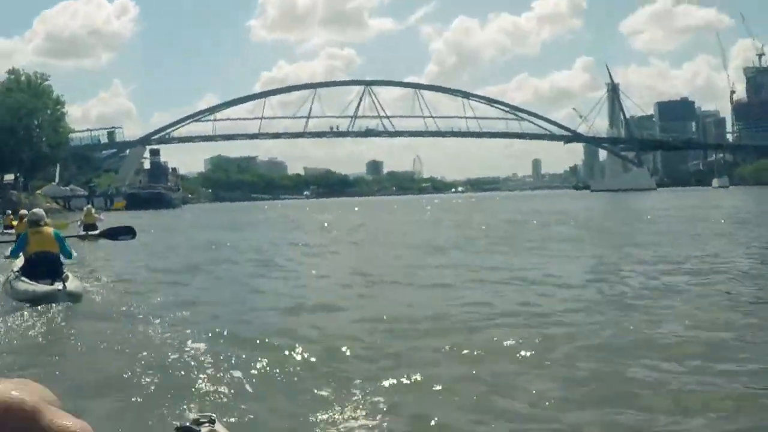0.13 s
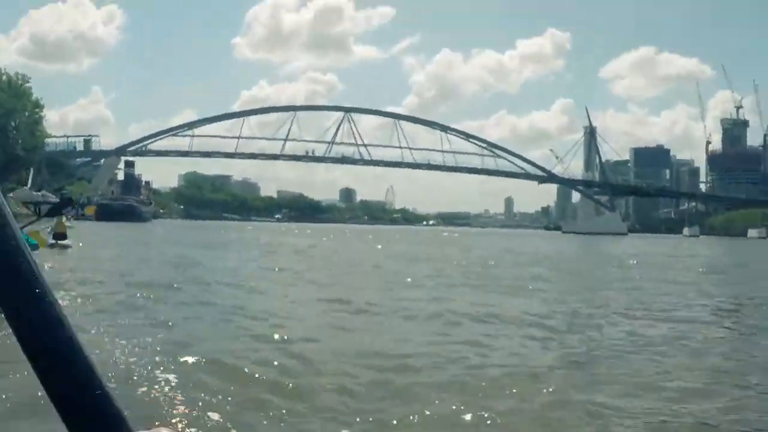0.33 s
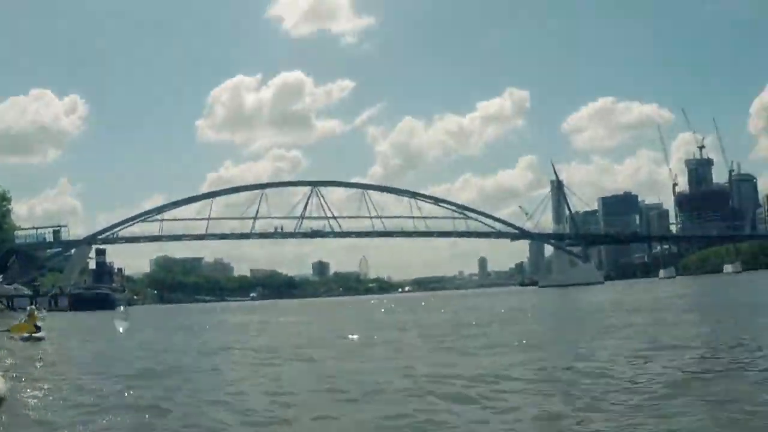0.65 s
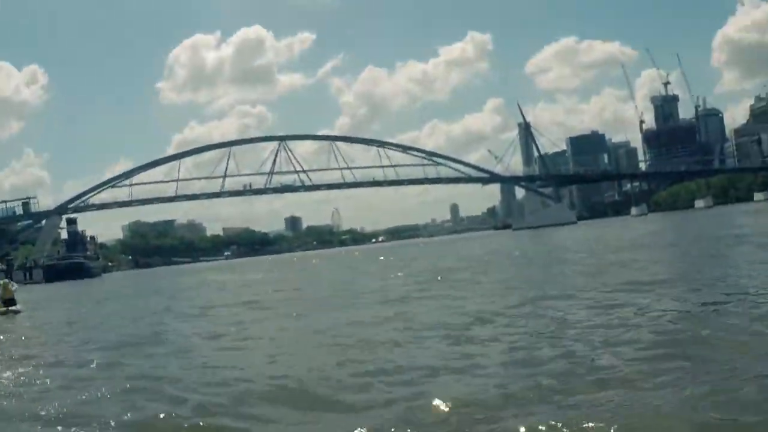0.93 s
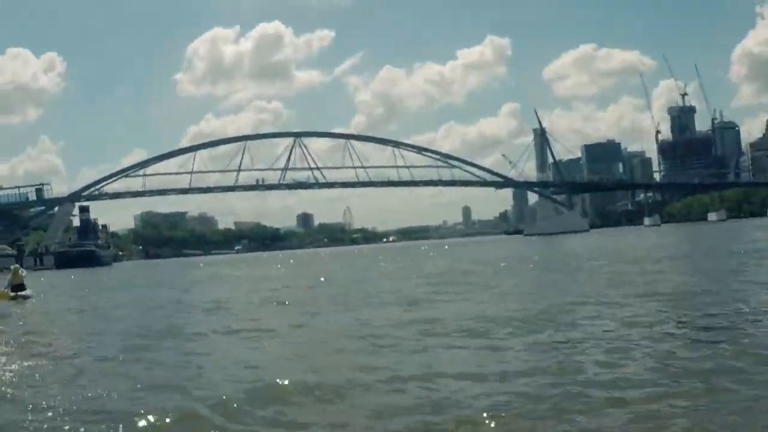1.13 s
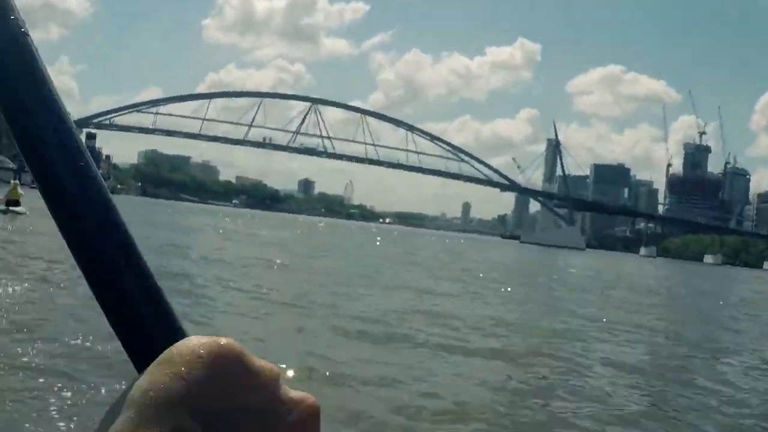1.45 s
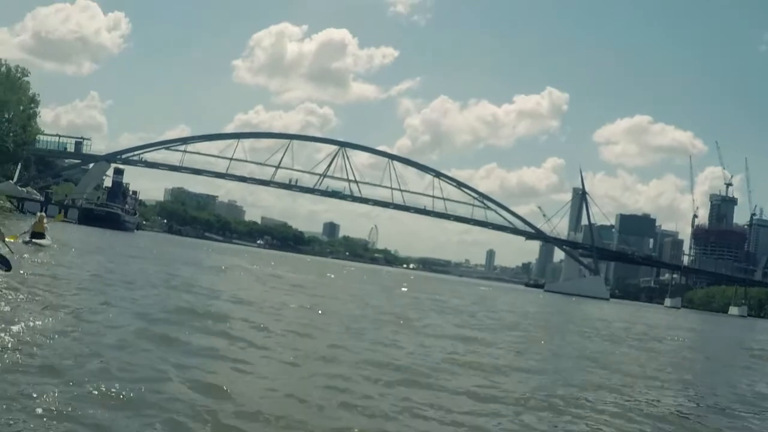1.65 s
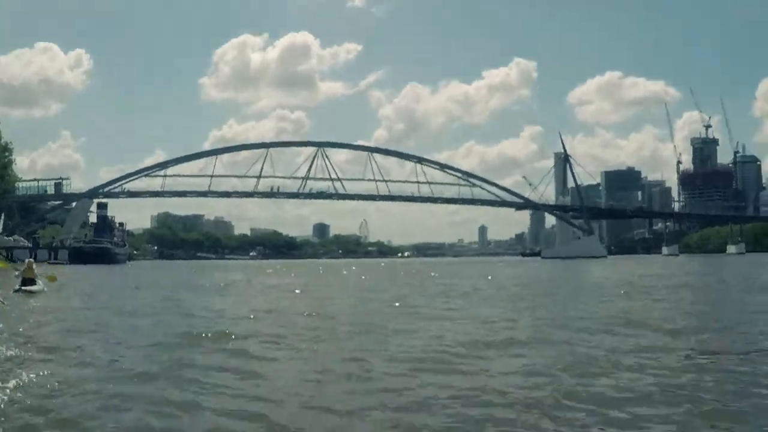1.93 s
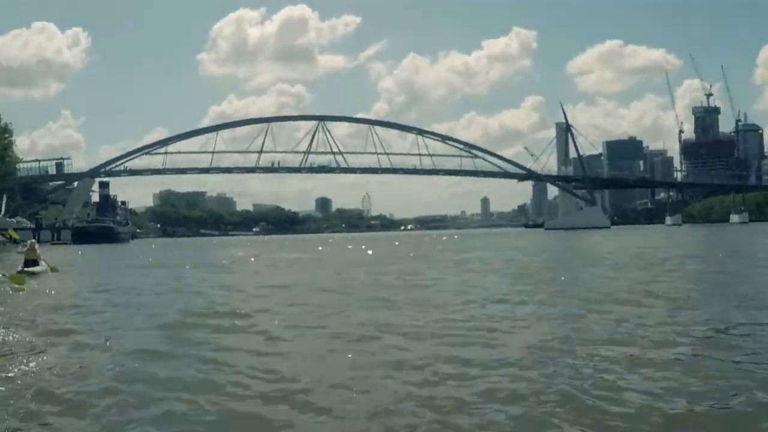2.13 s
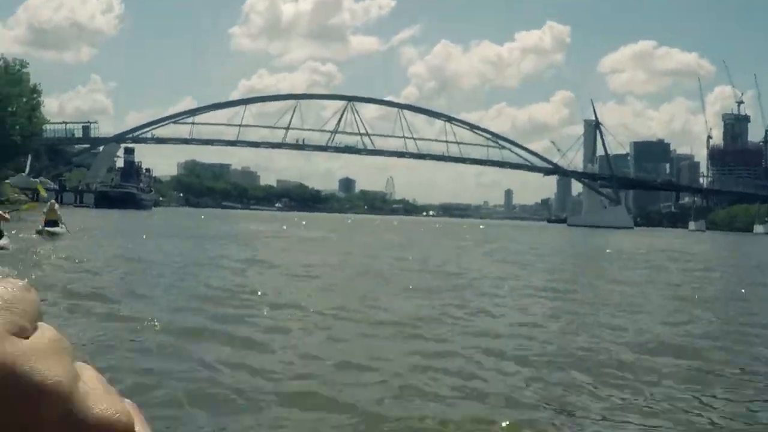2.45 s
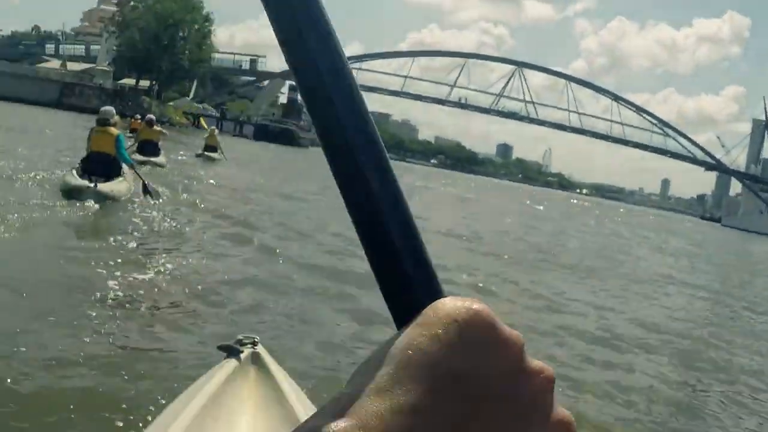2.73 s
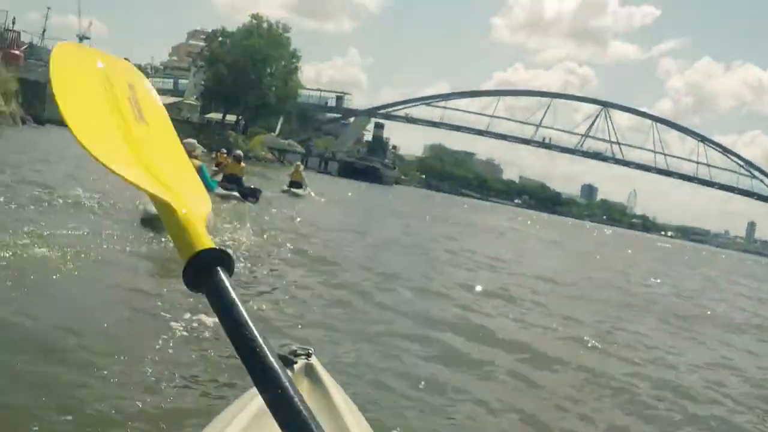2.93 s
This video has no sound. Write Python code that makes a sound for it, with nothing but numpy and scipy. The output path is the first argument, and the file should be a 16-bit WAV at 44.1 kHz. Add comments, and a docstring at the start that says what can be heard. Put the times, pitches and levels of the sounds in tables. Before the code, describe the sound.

A kayak paddle churns river water close to a muffled microphone; wind rumbles low throughout, bubbles plop and drops tick, a heavy splash comes early, and a booming hull slap follows late.

```python
"""A kayak is paddled along a choppy river, heard from a camera in a waterproof case worn by the paddler.
From the start, wind (filtered noise) buffets the case, the river washes (noise and tiny bubbles), and a
faint tone whines once a second. Soon the strokes add spray and gulps (ringing bubbles), then drops tick (short
noise). Heavy water gives a low shudder at 0.67 s; a plop of falling pitch follows at 1.34 s. At 2.48 s
a splash slaps close by (noise bands) and the hull rings and booms. The case colours the water sounds."""
import sys
import numpy as np
from scipy import signal
from scipy.fft import rfft, irfft
from scipy.io import wavfile
from scipy.ndimage import uniform_filter1d

SR = 44100
rng = np.random.default_rng(int(sys.argv[2]) if len(sys.argv) > 2 else 0)


def dump(signal):
    """Clip the signal to [-1, 1] and save it as 16-bit WAV at the path in sys.argv[1]."""
    limited = np.clip(np.atleast_2d(signal).T, -1, 1)
    pcm = np.round(limited * 32767).astype(np.int16)
    wavfile.write(sys.argv[1], SR, pcm)


N = 136710
TIME = np.arange(N) / SR  # seconds
FREQS = np.fft.rfftfreq(N, 1 / SR)  # Hz


def amp(db):
    """Turns decibels into a gain."""
    return 10 ** (np.asarray(db) / 20)


def unit(x):
    """Scales a sound to an average (rms) strength of 1."""
    return x / np.sqrt(np.mean(x ** 2) + 1e-20)


def curve(points):
    """Joins a table of (time, value) by straight lines, one value per sample."""
    return np.interp(TIME, *np.transpose(points))


def spectrum(points):
    """Joins a table of (frequency, dB) by straight lines along a logarithmic pitch scale."""
    hz, db = np.transpose(points)
    return np.interp(np.log(FREQS + 1), np.log(hz + 1), db)


def noise(gain):
    """Random noise of rms 1, with each frequency scaled by the given gain."""
    white = rng.standard_normal(N)
    return unit(irfft(rfft(white) * gain, N))


def band(hz, octaves):
    """Noise in a bell-shaped band around one pitch."""
    distance = np.log2((FREQS + 1) / hz) / octaves
    return noise(np.exp(-.5 * distance ** 2))


def drift(rate_hz):
    """A randomly wandering control of rms 1, mostly slower than the given rate."""
    return noise(np.exp(-(FREQS / rate_hz) ** 2))


def steadied(x, seconds):
    """Evens out the swells of a noise that are slower than the given time."""
    power = abs(uniform_filter1d(x ** 2, max(int(seconds * SR), 2)))
    return x / np.sqrt(power + 1e-6)


def burst(start, rise, decay):
    """A loudness shape: straight rise, then exponential decay."""
    t = TIME - start
    return np.clip(t / rise, 0, 1) * np.exp(-np.maximum(t - rise, 0) / decay)


def add(mix, s, sound):
    """Mixes a sound in at a time in seconds."""
    part = mix[max(round(s * SR), 0):][:len(sound)]
    part += sound[:len(part)]


def bubble(hz, t60, rise, glide):
    """A trapped air bubble: a ring that fades by 60 dB in t60 seconds, its pitch creeping up if glide > 0."""
    t = np.arange(0, t60, 1 / SR)
    loudness = (1 - np.exp(-t / rise)) * amp(-60 * t / t60)
    return loudness * np.sin(2 * np.pi * hz * t * (1 + glide * t / t60))


def bubbles(hz, spread, per_s, cycles, spread_db, size=N, count=24):
    """A swarm of bubbles of many sizes around one pitch, each ringing for a set number of cycles, rms 1."""
    out = np.zeros(size)
    for step in np.linspace(-1, 1, count) + rng.uniform(-1.25, 1, count) / count:
        pitch = min(hz * np.exp(2 * spread * step), SR / 3)
        births = (rng.random(size) < per_s / count / SR) * rng.choice([-1, 1], size)
        strength = amp(spread_db * np.minimum(rng.exponential(1, size), 4))
        strength = strength * np.exp(-step ** 2) * np.sqrt(pitch)
        ring = bubble(pitch, cycles / pitch, .4 / pitch, 0.099)
        out += signal.oaconvolve(births * strength, ring)[:size]
    return unit(out)


def swarms(rows, spread, cycles, spread_db):
    """Swarms of bubbles that swell and die away exponentially around their loudest moments."""
    out = np.zeros(N)
    for s, rise, fall, db, hz, per_s in rows:
        # three quarters of a second, from a quarter second before the height
        t = np.arange(SR // 2 + SR // 4) / SR + max(s - 1 / 4, 0)
        swarm = steadied(bubbles(hz, spread, per_s, cycles, spread_db, size=len(t)), 0.017)
        loudness = amp(db) * np.exp(-np.maximum((s - t) / rise, (t - s) / fall))
        add(out, t[0], swarm * loudness)
    return out


def falling_ring(s, db, first_hz, last_hz, glide, rise, decay):
    """A damped ring whose pitch falls quickly at first, then settles."""
    hz = last_hz + (first_hz - last_hz) * np.exp(-np.maximum(TIME - s, 0) / glide)
    phase = 2 * np.pi * np.cumsum(hz * (TIME >= s)) / SR
    return amp(db) * burst(s, rise, decay) * np.sin(phase)


# strength of the wind's slow rumble: (time [s], level [dB])
RUMBLE_LEVEL = [(0, -36.5), (.12, -31.5), (.26, -27), (.37, -23.5), (.48, -28), (.56, -42.5), (.72, -33),
                (.88, -41.5), (1.06, -32), (1.3, -33), (1.55, -34), (1.88, -35.5), (2.0, -39.5), (2.2, -38),
                (2.44, -37.5), (2.66, -30), (2.84, -27.5), (2.96, -36.5), (3.1, -34.5)]
# strength of the quicker buffeting, before its random lumps: (time [s], level [dB])
BUFFET_LEVEL = [(0, -58.5), (.12, -47), (.23, -51), (.42, -46.5), (.58, -45), (.75, -42.5), (.86, -50.5),
                (1.05, -48), (1.3, -53.5), (1.58, -45.5), (1.75, -52.5), (1.88, -46.5), (2.0, -50),
                (2.27, -45.5), (2.42, -48), (2.6, -49.5), (2.82, -46), (3.1, -48.5)]
# tone of the slow rumble: (frequency [Hz], relative level [dB per Hz])
RUMBLE_TONE = [(1, -43), (14, 4), (24, 8.5), (38, -0.5), (52, -7), (72, -13.5), (105, -29), (160, -37.5),
               (300, -42), (800, -79), (4000, -100)]
# tone of the quicker buffeting: (frequency [Hz], relative level [dB per Hz])
BUFFET_TONE = [(25, -40), (45, -4), (70, 3.5), (95, -9.5), (125, -15.5), (200, -18), (400, -28.5),
               (1500, -84)]
BUFFET_LUMPS_DB = 1.3


def wind():
    """Slow pressure swings that follow the gusts, and quicker lumps of buffeting above them."""
    rumble = steadied(noise(amp(spectrum(RUMBLE_TONE))), 0.148)
    buffet = steadied(noise(amp(spectrum(BUFFET_TONE))), 0.13)
    buffet_db = curve(BUFFET_LEVEL) + BUFFET_LUMPS_DB * drift(rate_hz=15)
    return rumble * amp(curve(RUMBLE_LEVEL)) + buffet * amp(buffet_db)


# strength of the river, before the case: (time [s], level [dB])
WASH_LEVEL = [(0, -45.5), (.3, -45.5), (.7, -44.5), (.92, -45.5), (1.3, -46.5), (1.5, -45), (1.8, -44.5),
              (2.1, -44.5), (2.35, -45.5), (2.55, -47.5), (2.75, -43.5), (2.95, -44.5), (3.1, -44.5)]
# tone of the wash: (frequency [Hz], relative level [dB per Hz])
WASH_TONE = [(40, -16), (200, -2.5), (400, -0.5), (650, 0.5), (1000, 2.5), (1600, 3.5), (2400, 0),
             (4000, -3.5), (6500, -6.5), (9000, -3.5), (15000, 3)]
WASH_FLICKER_DB, WASH_FLICKER_HZ = 1.23, 22.2
# fizz: level against the wash, bubbles per second, unevenness of their strengths
FIZZ_DB, FIZZ_PER_S, FIZZ_SPREAD_DB = -10.5, 900, 4


def river():
    """Wash of the chop, flickering octave by octave, with small bubbles bursting nearby."""
    octave = np.log2(FREQS + 1)
    gain = amp(spectrum(WASH_TONE))
    wash = np.zeros(N)
    for k in range(15):
        # neighbouring octaves overlap and cross-fade
        part = gain * np.sqrt(np.maximum(1 - abs(octave - k), 0))
        flicker = amp(WASH_FLICKER_DB * drift(rate_hz=WASH_FLICKER_HZ))
        wash += np.linalg.norm(part) * noise(part) * flicker
    fizz = bubbles(hz=2630, spread=0.718, per_s=FIZZ_PER_S, cycles=36.5,
                   spread_db=FIZZ_SPREAD_DB, count=48)
    return amp(curve(WASH_LEVEL)) * (unit(wash) + amp(FIZZ_DB) * fizz)


# a faint thin whine that comes once a second: (start [s], pitch [Hz])
WHINE_TIMES = [(.015, 6460), (.99, 6400), (2.008, 6570), (3.035, 6470)]
WHINE_S, WHINE_DB, WHINE_WAVER = 0.088, -69, 0.0058  # waver: rms share of the pitch


def whine():
    """A wavering thread of tone, probably from the camera's electronics."""
    out = np.zeros(N)
    waver = 1 + WHINE_WAVER * drift(rate_hz=59)
    for s, hz in WHINE_TIMES:
        # 6 ms fades at both ends
        gate = np.clip(np.minimum(TIME - s, s + WHINE_S - TIME) / .006, 0, 1)
        out += gate * np.sin(2 * np.pi * np.cumsum(hz * waver) / SR)
    return amp(WHINE_DB) * out


# single bubbles, from deep gulps at the hull to small plinks, before the case:
# (time [s], level [dB], with the pitch between them) = (time [s], pitch [Hz], level [dB], ring time [s])
GULP_BUBBLES = [(.057, 7500, -38, .018), (.383, 530, -37.5, 0.081), (.434, 2920, -38, .03),
                (0.584, 497, -50, 0.055), (.6725, 2550, -23, 0.011), (0.673, 4250, -30, .013),
                (.688, 800, -43, 0.088), (0.731, 896, -42, 0.14), (1.037, 1080, -40, 0.046),
                (1.037, 664, -46, .045), (1.553, 914, -42, 0.067), (1.642, 345, -33, .05),
                (1.722, 618, -47, .05), (2.647, 794, -41, 0.052), (2.787, 7500, -37, .01),
                (2.788, 497, -38.5, 0.028), (2.8295, 3070, -41.5, 0.043), (2.832, 1160, -39, 0.038),
                (2.856, 666, -42, 0.057), (2.858, 907, -32.5, 0.034), (2.8565, 2960, -41, .022),
                (2.874, 7200, -32, .014), (2.933, 720, -40.5, 0.034)]
GULP_RISE_S, GULP_GLIDE = 0.00042, 0.043
# spray thrown by the blade, before the case:
# (time of height [s], rise [s], fall [s], level [dB], pitch [Hz], droplets [per s])
SPRAY_SWARMS = [(.06, 0.0084, 0.024, -51, 8100, 1800), (.265, 0.0053, 0.0043, -42.5, 6000, 5500),
                (.437, 0.0066, 0.0044, -47.5, 2900, 4500), (.508, 0.0066, 0.0088, -48, 3240, 2900),
                (.63, 0.049, 0.11, -53, 3670, 4300), (1.235, 0.011, .025, -44.5, 9000, 4800),
                (1.5, 0.078, 0.037, -50.5, 4170, 5800), (1.591, 0.007, 0.0066, -41.5, 3730, 3400),
                (1.65, 0.042, 0.048, -44.5, 6340, 3500), (2.86, 0.018, 0.016, -43, 8000, 900)]
SPRAY_SPREAD, SPRAY_CYCLES = 0.34, 4.3
# water churned by blade and hull, before the case:
# (time of height [s], rise [s], fall [s], level [dB], bubble pitch [Hz], bubbles [per s])
SLOSH_SWARMS = [(.385, 0.053, 0.036, -45.5, 782, 700), (.48, 0.028, 0.023, -48, 740, 600),
                (.715, 0.045, 0.049, -52, 898, 600), (1.04, 0.014, 0.0087, -54.5, 920, 380),
                (1.635, .05, 0.026, -52.5, 450, 2400), (1.68, .014, 0.02, -46, 1170, 1500),
                (1.74, 0.065, 0.1, -48, 760, 4000), (2.2, 0.031, 0.044, -55.5, 455, 620),
                (2.85, 0.037, 0.028, -48.5, 970, 560), (2.97, 0.021, 0.044, -53.5, 600, 680)]
SLOSH_SPREAD, SLOSH_CYCLES = 0.52, 10


def strokes():
    """Gulps ring as single bubbles; spray and churning water are swarms of short rings."""
    out = swarms(SLOSH_SWARMS, SLOSH_SPREAD, SLOSH_CYCLES, spread_db=1.5)
    out += swarms(SPRAY_SWARMS, SPRAY_SPREAD, SPRAY_CYCLES, spread_db=4.5)
    for s, hz, db, t60 in GULP_BUBBLES:
        add(out, s, amp(db) * bubble(hz, t60, GULP_RISE_S, GULP_GLIDE))
    return out


# drops landing near the case, before its colouring:
# (time [s], level [dB], pitch [Hz], width [octaves], decay [s])
DROP_TICKS = [(0.3, -46, 3000, 0.4, 0.0035), (0.553, -48, 3140, .4, .003), (0.621, -44, 1900, .55, 0.0033),
              (0.6715, -35.5, 2400, .5, 0.0017), (0.801, -40, 1650, 0.39, 0.004),
              (1.113, -42, 2760, 0.46, 0.0036), (1.911, -42, 4350, 0.29, 0.0028),
              (2.1396, -40.5, 4160, 0.26, 0.0015), (2.613, -50, 3100, 0.32, 0.0044),
              (2.654, -45, 2850, .4, 0.0033), (2.705, -47.5, 2630, 0.3, 0.0087),
              (2.8548, -33, 1250, 1.3, 0.0013), (3.029, -43.5, 2900, 0.37, 0.0027),
              (3.059, -44, 2400, .55, 0.0013)]
DROP_RISE_S = 0.0021


def drops():
    """Short wet ticks: brief bursts of noise around one pitch."""
    out = np.zeros(N)
    for s, db, hz, octaves, decay in DROP_TICKS:
        tick = steadied(band(hz, octaves), 0.0018)
        out += amp(db) * tick * burst(s, DROP_RISE_S, decay)
    return out


# dull shudders with the heaviest water: (time [s], level [dB], pitch [Hz], rise [s], decay [s])
SHUDDERS = [(0.674, -34.5, 56, 0.0115, 0.059), (.70, -44, 150, .02, .018)]
THUD_WIDTH_OCTAVES = 0.38
# the hull booms smoothly after the slap, sinking in pitch; one row:
# (time [s], level [dB], first pitch [Hz], last pitch [Hz], glide [s], rise [s], decay [s])
HULL_BOOM = (2.491, -26.5, 125, 73, .009, .007, .07)


def thuds():
    """Low shudders of noise with the heavy hits, and the hull's boom as a falling ring."""
    out = falling_ring(*HULL_BOOM)
    for s, db, hz, rise, decay in SHUDDERS:
        shudder = steadied(band(hz, THUD_WIDTH_OCTAVES), 0.034)
        out += amp(db) * shudder * burst(s, rise, decay)
    return out


# plops whose pitch falls as the air pocket opens out, before the case:
# (time [s], level [dB], first pitch [Hz], last pitch [Hz], glide [s], rise [s], decay [s])
AIR_POCKETS = [(1.343, -37.5, 402, 254, 0.0043, 0.00073, 0.0089), (2.481, -25, 400, 170, .014, .0012, .011),
               (2.867, -42.5, 3240, 2730, 0.0048, 0.0028, 0.005)]


def plops():
    """Open pockets of air, each ringing with a falling pitch."""
    return sum(falling_ring(*row) for row in AIR_POCKETS)


SLAP_S, SLAP_WIDTH_OCTAVES = 2.48, 0.6
# the close slap, band by band, before the case: (pitch [Hz], level [dB], rise [s], decay [s])
SLAP_BANDS = [(140, -40, 0.032, 0.025), (270, -38.5, 0.0052, 0.044), (1100, -35, 0.0022, 0.017),
              (2600, -31.5, 0.00075, 0.0098), (9400, -28.5, 0.001, 0.0035)]
# the hull rings under the slap, before the case: (pitch [Hz], level [dB], ring time [s])
HULL_RINGS = [(278, -46, .2), (441, -44, .13), (513, -40.5, 0.14)]
HULL_RISE_S = 0.0014


def slap():
    """A lump of water hits: the treble cracks first, the hull rings and the bass lingers."""
    out = np.zeros(N)
    for hz, db, rise, decay in SLAP_BANDS:
        splash = steadied(band(hz, SLAP_WIDTH_OCTAVES), decay)
        out += amp(db) * splash * burst(SLAP_S, rise, decay)
    for hz, db, t60 in HULL_RINGS:
        add(out, SLAP_S, amp(db) * bubble(hz, t60, HULL_RISE_S, 0))
    return out


# what the case lets through: (frequency [Hz], gain [dB])
CASE_TONE = [(100, -2.5), (1500, -1.5), (2400, -4.5), (3300, -4.5), (4200, -6), (5200, -9), (6400, -11.5),
             (7800, -14), (9000, -17.5), (13000, -23.5), (15300, -30.5)]
# resonances and notches of the case, added to that: (frequency [Hz], width [Hz], gain [dB])
CASE_RESONANCES = [(1275, 88, 2.5), (1880, 45, -5.5), (2000, 90, 1), (2982, 236, 6.5), (3682, 100, 5.5),
                   (4800, 83, 3), (6030, 89, 1), (7190, 350, 4.5), (10640, 350, 3)]


def case(x):
    """The waterproof case dulls the treble and rings at a few pitches."""
    db = spectrum(CASE_TONE)
    for hz, width, gain in CASE_RESONANCES:
        db = db + gain * np.exp(-((FREQS - hz) / width) ** 2)
    # minimum phase: the filter answers at once, with no ringing ahead of a sound
    log_gain = np.log(amp(np.concatenate([db, db[-2:0:-1]])))
    response = irfft(np.exp(np.conj(signal.hilbert(log_gain)))[:len(db)])[:2048]
    return signal.oaconvolve(x, response)[:N]


def scene():
    """Water heard through the case, with the wind, the thuds and the whine on top."""
    water = river() + strokes() + drops() + plops() + slap()
    return (case(water) + wind() + whine() + thuds())[None]


CUTOFF_HZ = 15300


def record(dry):
    """The recorder's band limit: a low-pass filter."""
    lowpass = signal.firwin(511, CUTOFF_HZ, window=("kaiser", 9), fs=SR)
    return signal.oaconvolve(dry, lowpass[None], "same")


dry = scene()
out = record(dry)
dump(out)
```